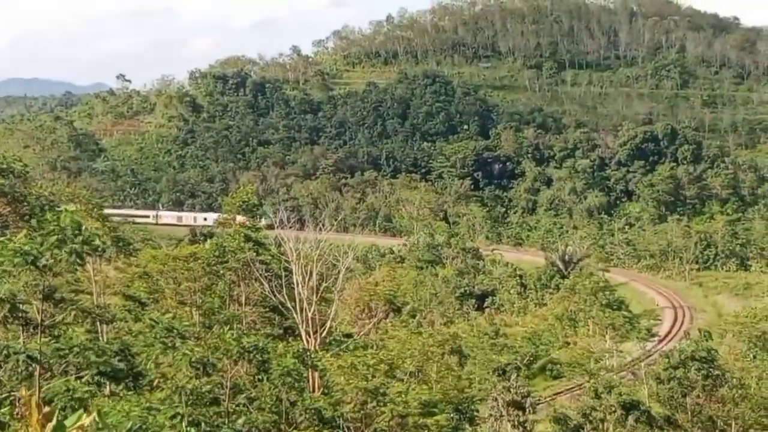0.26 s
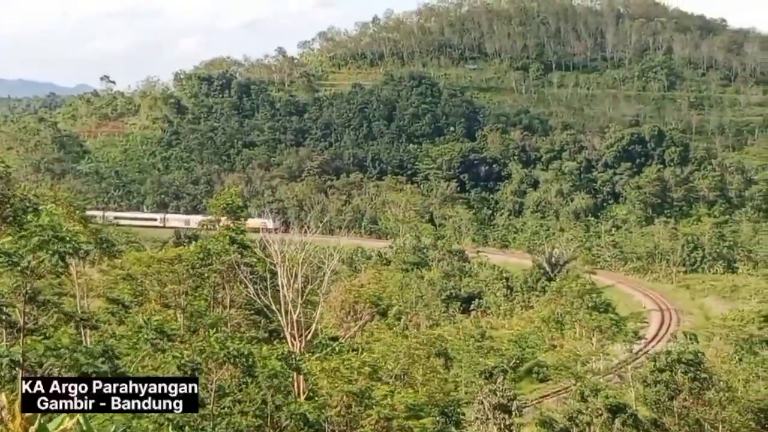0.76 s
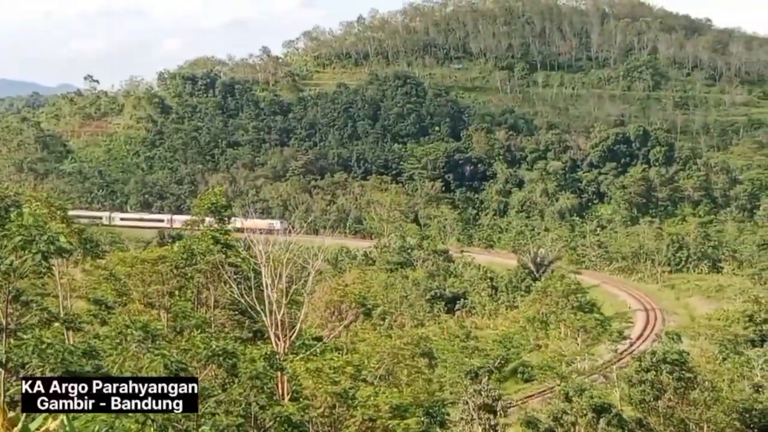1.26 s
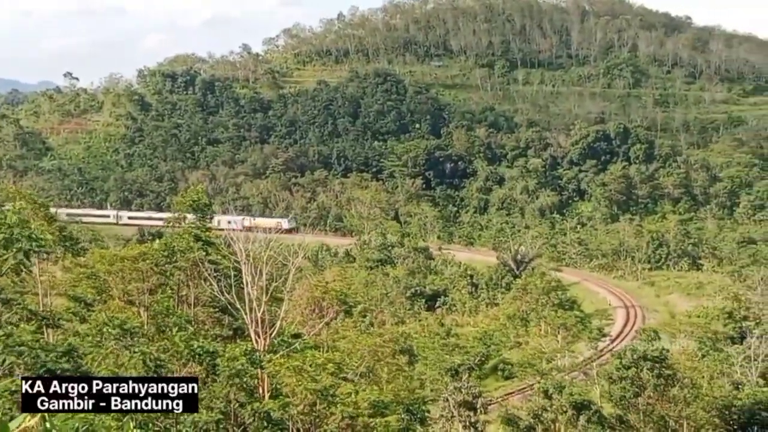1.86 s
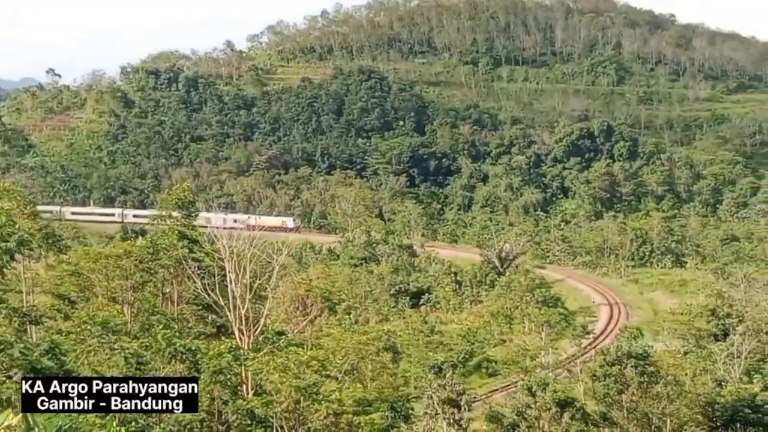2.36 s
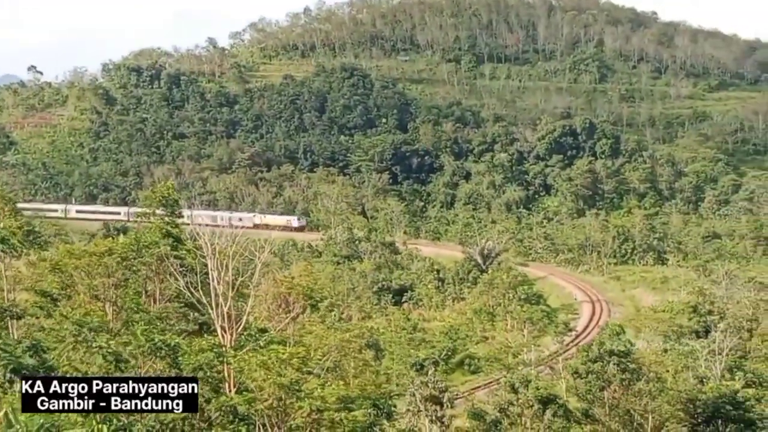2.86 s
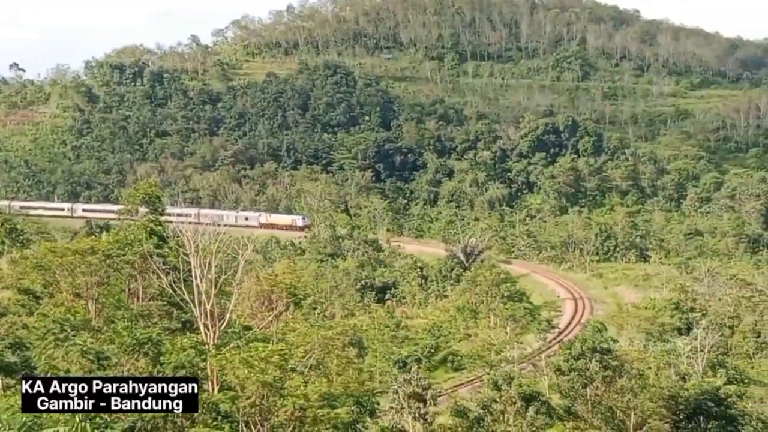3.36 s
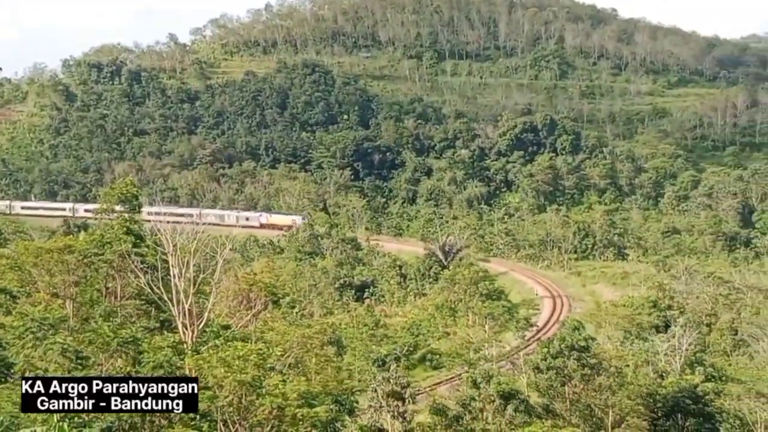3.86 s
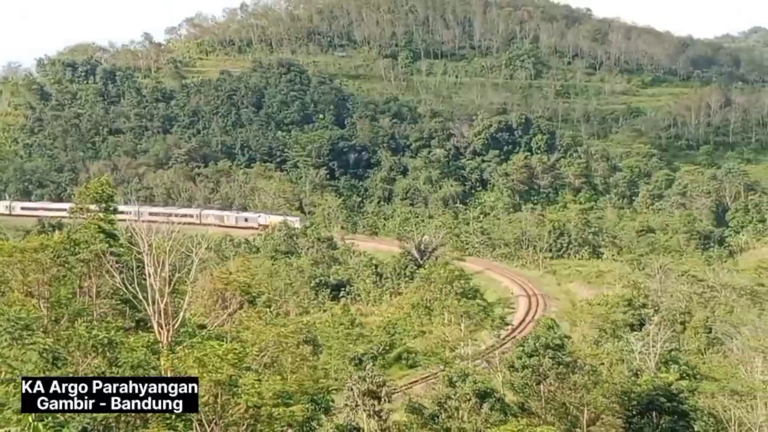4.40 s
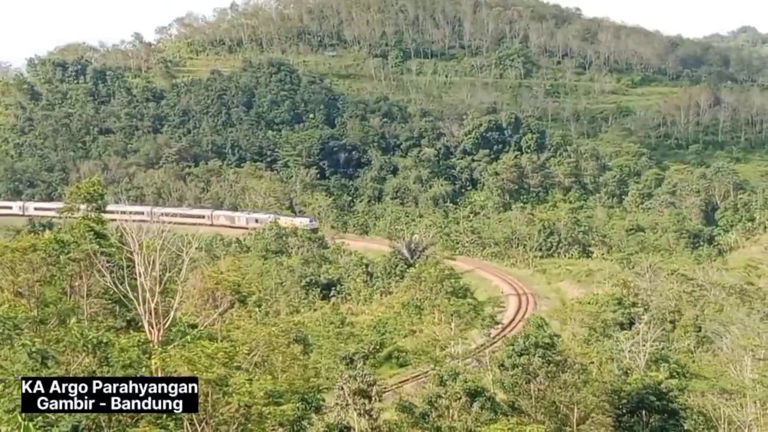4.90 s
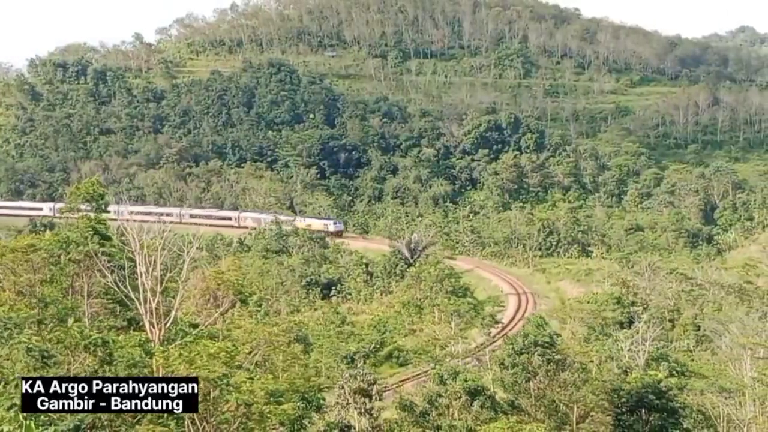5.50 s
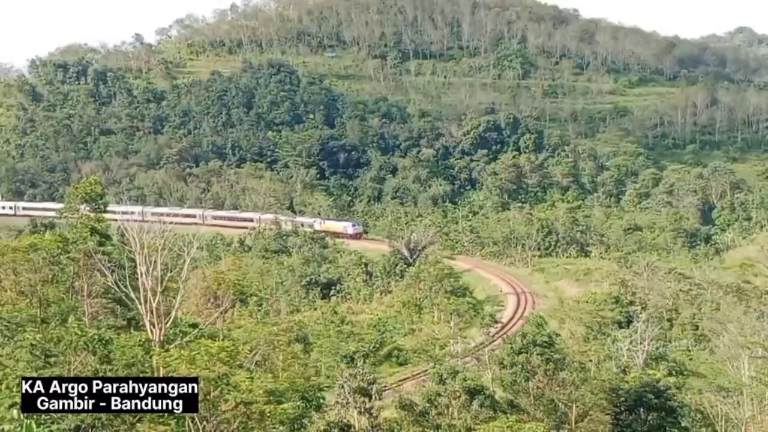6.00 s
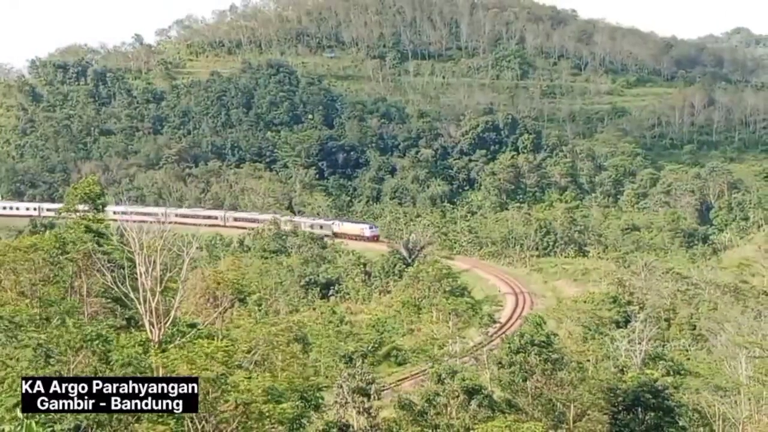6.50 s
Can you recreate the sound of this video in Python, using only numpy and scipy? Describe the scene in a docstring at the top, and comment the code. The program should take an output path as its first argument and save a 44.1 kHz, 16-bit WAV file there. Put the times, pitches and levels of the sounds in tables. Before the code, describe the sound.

Outdoors on an open hillside, wind hits an unprotected microphone with dense low thumps and fluttering gusts. Far behind it a diesel train gives a soft, steady roar with a rapid throbbing exhaust. After about three seconds the wind thins and the train comes forward, strongest near four and a half seconds, then drops quickly to faint, hollow, wavering bands of noise with a couple of soft bumps of wind.

```python
"""Gusts and thumps of wind, made from coloured noise and short swings, buffet the microphone at first. Behind
them a far train roars in bands of noise, its exhaust throbbing as a pulsing loudness. The wind weakens in the
second half, while a faint hiss, a high sizzle and a few ticks lie beneath. Near the end the roar fades, and
faint, hollow bands of noise wander in pitch. There the whole sound dips briefly twice."""
import sys
import numpy as np
from scipy import signal
from scipy.fft import rfft, irfft, next_fast_len
from scipy.io import wavfile
from scipy.ndimage import uniform_filter1d

SR = 44100
rng = np.random.default_rng(int(sys.argv[2]) if len(sys.argv) > 2 else 0)


def unload_wav(signal):
    """Save mono or channel-first audio to the path in sys.argv[1] as 16-bit WAV at rate SR, clipped to [-1, 1]."""
    wavfile.write(
        sys.argv[1],
        SR,
        np.round(np.clip(np.atleast_2d(signal).T, -1, 1) * 32767).astype(np.int16),
    )


N = 297586
TIME = np.arange(N) / SR
FREQS = np.maximum(np.fft.rfftfreq(N, 1 / SR), 1)

# how strongly the train's sound reaches the hillside: (time [s], level [dB])
CARRY = [(0, -2), (0.45, -7), (1.55, -4.5), (2.05, -2.5), (3.95, -1.5), (4.45, 5), (5.21, 1.5),
         (5.33, -11.5), (5.48, -21.5), (5.85, -19), (6.1, -23), (6.42, -23.5), (6.75, -26)]
# single eddies that hit the microphone:
# (time [s], peak level [dB], pitch at the middle [Hz], steep front relative to the swing [dB])
THUMPS = [(0.1, -5.5, 190, -21.5), (0.145, -5, 235, -19), (0.165, -5.5, 250, -11), (0.193, -2.5, 215, -23),
          (0.2322, -3.5, 356, 12), (0.249, -5.5, 330, 3), (0.256, -7.5, 680, 0), (0.33, -11, 380, 18),
          (0.446, -10.5, 310, -6), (0.484, -2.5, 199, -4), (0.594, -9, 270, -17), (0.731, -5, 215, -13),
          (0.751, -6.5, 290, -1.5), (0.858, -6.5, 394, -7), (0.904, -6, 253, -29), (1.027, -3.5, 183, -31),
          (1.262, -9.5, 272, -18), (1.3613, -4.5, 218, -32), (1.394, -7, 287, -18.5),
          (1.495, -7.5, 225, -23), (1.517, -5.5, 185, -22.5), (1.546, -5, 190, -24),
          (1.6324, -7.5, 315, -10.5), (1.682, -5, 293, -24), (1.697, -3, 460, -9), (1.833, -7, 241, -28),
          (1.994, -11, 247, -9.5), (2.196, -8.5, 171, -26.5), (2.254, -4, 219, -22), (2.459, -5, 200, -15),
          (2.524, -10, 199, -11), (2.714, -10.5, 226, -18.5), (3.614, -16, 185, -21),
          (3.813, -14, 267, -17), (3.919, -6, 200, -3.5), (4.058, -17, 224, -17), (4.271, -20, 167, -28),
          (4.668, -18, 180, -20), (5.052, -22.5, 169, -15), (6.331, -16.5, 160, -30),
          (6.541, -12, 159, -42)]


def from_db(db):
    """Turn decibels into a gain."""
    return 10 ** (np.asarray(db) / 20)


def rms_one(x):
    """Scale to an rms (average strength) of 1."""
    return x / np.sqrt(np.mean(x ** 2) + 1e-20)


def in_time(rows):
    """Draw each column of a time table as a curve, sample by sample."""
    times, *columns = np.transpose(rows)
    return [np.interp(TIME, times, column) for column in columns]


def bell(middle_s, half_s):
    """A smooth rise and fall of height 1 round one moment."""
    return np.exp(-.5 * np.minimum(((TIME - middle_s) / half_s) ** 2, 100))


def colour(points):
    """Turn a spectrum table into a gain at every frequency."""
    hz, db = np.transpose(points)
    return from_db(np.interp(np.log(FREQS), np.log(hz), db))


def noise(gains):
    """Random noise with the given gain at every frequency; rms 1."""
    size = next_fast_len(N, True)
    shape = np.interp(np.fft.rfftfreq(size, 1 / SR), FREQS, gains)
    spectrum = rfft(rng.standard_normal(size)) * shape
    return rms_one(irfft(spectrum, size)[:N])


def drift(rate):
    """Slow chance, about rate changes a second; rms 1."""
    return noise(1 / (1 + (FREQS / rate) ** 4))


def even(x, span_s):
    """Hold the level near 1 over spans of span_s, keeping the faster grain."""
    size = max(int(span_s * SR), 8)
    power = uniform_filter1d(uniform_filter1d(x ** 2, size), size)
    return x / np.sqrt(np.abs(power) + 1e-12)


def patches(hz, times, patch_hz, patch_s):
    """Smooth chance over pitch and time; rms 1."""
    field = rng.standard_normal((len(hz), len(times)))
    steps_per_patch = (patch_hz / hz[1], patch_s / times[1])
    for axis, steps in enumerate(steps_per_patch):
        blur = np.exp(-.5 * (np.arange(-40, 41) / steps) ** 2)
        field = signal.fftconvolve(field, np.expand_dims(blur, 1 - axis), "same")
    return rms_one(field)


def scatter(x, patchy_db, patch_hz, patch_s):
    """Moving air and many paths through the trees make each pitch swell and fade on its own."""
    hz, times, cells = signal.stft(x, SR, nperseg=1024, noverlap=768)
    cells = cells * from_db(patchy_db * patches(hz, times, patch_hz, patch_s))
    return rms_one(signal.istft(cells, SR, nperseg=1024, noverlap=768)[1][:N])


def sizzle():
    """A faint high sizzle of the hillside: patchy noise whose level flickers."""
    # (frequency [Hz], relative level [dB])
    sizzle_spectrum = [(4900, -20.5), (5450, 1), (6700, -7.5), (7800, 2), (8300, -22.5)]
    # before the flicker: (time [s], level [dB])
    sizzle_level = [(0, -79), (1.1, -82.5), (2.5, -81), (4.3, -75), (5.15, -73.5), (5.35, -82)]
    grain = scatter(noise(colour(sizzle_spectrum)), patchy_db=6.0, patch_hz=110, patch_s=0.0055)
    flicker_db = 2.0 * drift(25)
    return from_db(in_time(sizzle_level)[0] + flicker_db) * grain


def ticks():
    """Tiny high ticks near the microphone: each is a tone that dies away almost at once."""
    # (time [s], starting level [dB])
    tick_list = [(0.848, -46.5), (1.353, -52), (1.598, -48), (3.888, -55)]
    pitch_hz, decay_s = 11770, .0002
    out = np.zeros(N)
    age = TIME[:SR // 100]
    tick = np.sin(2 * np.pi * pitch_hz * age) * np.exp(-age / decay_s)
    for time_s, level_db in tick_list:
        start = int(time_s * SR)
        out[start:start + len(tick)] += from_db(level_db) * tick
    return out


def background():
    """An even hiss of plain noise, a flickering high sizzle and a few tiny ticks."""
    hiss_db = -89.5
    return from_db(hiss_db) * rng.standard_normal(N) + sizzle() + ticks()


def wind_levels():
    """Buffeting and flutter in dB: the gusts add their power to the steady blow."""
    # the steady blow between gusts: (time [s], level [dB])
    steady_blow = [(0, -15), (0.8, -19.5), (1.2, -20.5), (1.75, -17.5), (2.45, -20), (2.56, -25.5),
                   (2.95, -28.5), (3.3, -31.5), (3.5, -27), (4.02, -25.5), (4.18, -35), (5.2, -38.5),
                   (5.27, -54.5), (6.1, -59.5), (6.45, -42.5), (6.75, -57)]
    # gusts: (time [s], half width [s], buffeting level [dB], level of the flutter of fine eddies [dB])
    gusts = [(0.186, 0.036, -26, -19), (0.27, 0.034, -38.5, -18), (0.402, 0.0091, -17.5, -16.5),
             (0.489, 0.006, -13.5, -13), (0.659, 0.0084, -13, -20), (0.785, 0.014, -13, -26),
             (0.862, 0.0034, -7, -16), (1.007, 0.011, -9.5, -23), (1.071, 0.0064, -16, -18.5),
             (1.386, 0.026, -16.5, -27.5), (1.613, 0.015, -13.5, -21.5), (1.652, 0.012, -19, -17.5),
             (1.83, 0.058, -21.5, -25), (2.022, 0.016, -15.5, -17), (2.27, 0.033, -17, -33),
             (2.352, 0.016, -13, -27.5), (2.449, 0.016, -11, -24), (2.628, 0.0079, -17, -34.5),
             (2.72, 0.049, -22, -34.5), (2.81, 0.0084, -23, -59), (3.414, 0.019, -19.5, -51),
             (3.825, 0.0082, -19, -38), (3.863, 0.005, -13, -27.5), (3.897, 0.014, -14, -24.5),
             (4.113, 0.0083, -23.5, -40), (4.437, 0.025, -27.5, -53), (4.55, 0.012, -28.5, -53),
             (4.861, 0.011, -28, -46), (5.47, 0.016, -47, -58), (5.695, 0.013, -37, -63),
             (5.81, 0.042, -32.5, -75), (6.344, 0.015, -24, -47), (6.39, 0.008, -28, -62)]
    blow_db = in_time(steady_blow)[0]
    buffet = from_db(blow_db) ** 2
    # the harder it blows, the more it flutters: -28 dB at a blow of -19 dB, and 1.7 dB more per dB
    flutter = from_db(-28 + 1.7 * (blow_db + 19)) ** 2
    for time_s, half_s, buffet_db, flutter_db in gusts:
        swell = bell(time_s, half_s)
        buffet = buffet + swell * from_db(buffet_db) ** 2
        flutter = flutter + swell * from_db(flutter_db) ** 2
    return 10 * np.log10(buffet), 10 * np.log10(flutter)


def wind(lumps_db, flutter_lumps_db, strong_db):
    """Lumpy swirling air at the microphone: a light breeze thuds dully, strong gusts add finer eddies."""
    # three colours of wind: (frequency [Hz], relative level [dB])
    strong_spectrum = [(32, -38.5), (50, -20), (70, -15), (105, 3.5), (180, 2.5), (260, -1), (340, -11.5),
                       (450, -22), (700, -35), (1500, -41), (4000, -85.5)]
    breeze_spectrum = [(32, -39), (50, -13), (70, 0.5), (105, 5), (135, 3.5), (190, -13.5), (260, -3.5),
                       (400, -35.5), (1000, -83.5)]
    flutter_spectrum = [(150, -16), (300, 11), (400, 9), (540, 1), (720, -6.5), (950, -14.5), (1400, -44.5),
                        (3500, -81.5)]
    gust_db, flutter_db = wind_levels()
    lumps = drift(32)
    eddies = rms_one(lumps + drift(80))
    # 0 in a light breeze, 1 in a strong gust, half way at strong_db
    strong = .5 + .5 * np.tanh((gust_db - strong_db) / 9)
    strong_air = np.sqrt(strong) * noise(colour(strong_spectrum))
    light_air = np.sqrt(1 - strong) * noise(colour(breeze_spectrum))
    buffet = even((strong_air + light_air) * from_db(lumps_db * lumps), span_s=0.041)
    flutter = noise(colour(flutter_spectrum)) * from_db(flutter_lumps_db * eddies)
    flutter = even(flutter, span_s=0.02)
    return from_db(gust_db) * buffet + from_db(flutter_db) * flutter


def lulls(depth, half_s):
    """A large eddy sweeps the smaller ones off the microphone: the wind's gain dips at each thump."""
    near = sum(bell(time_s, half_s) for time_s, *_ in THUMPS)
    return 1 - np.clip(depth * near, 0, .9)


def thumps(cycles, slowing, edge_s):
    """Each eddy shoves the diaphragm out and back, slowing as it passes, with a steep front between."""
    out = np.zeros(N)
    age = np.arange(-SR // 40, SR // 40) / SR
    front = age / edge_s / (1 + (age / edge_s) ** 2) ** 2
    for time_s, peak_db, hz, front_db in THUMPS:
        turns = (1 - np.exp(-slowing * age * hz)) / slowing
        swing = np.sin(2 * np.pi * turns) * np.exp(-.5 * (turns / cycles) ** 2)
        swing = swing * np.hanning(len(age))
        shove = swing / swing.max() + from_db(front_db) * front / front.max()
        start = int((time_s + age[0]) * SR)
        out[start:start + len(shove)] += from_db(peak_db) * shove / shove.max()
    return out


def hollow_band(curve, width_hz):
    """A narrow, almost pitched band of noise: slow chance carried on a wandering tone."""
    centre_hz, level_db = in_time(curve)
    phase = 2 * np.pi * np.cumsum(centre_hz) / SR
    narrow = drift(width_hz / 2) * np.cos(phase) + drift(width_hz / 2) * np.sin(phase)
    # fade in over 0.09 s, ending at the first time in the table
    fade_in = np.clip(1 + (TIME - curve[0][0]) / 0.09, 0, 1)
    waver_db = 1.8 * drift(32)
    return fade_in * from_db(level_db + waver_db) * even(narrow, span_s=0.028)


def hollow_bands():
    """Near the end: five narrow bands of noise, each wandering on its own."""
    # levels are before the waver: (time [s], centre [Hz], level [dB])
    lowest_path = [(5.15, 350, -52), (5.48, 338, -39.5), (5.58, 335, -46.5), (6.0, 318, -48),
                   (6.28, 295, -50.5), (6.45, 296, -42.5), (6.6, 300, -50)]
    second_path = [(5.18, 700, -52), (5.26, 710, -39.5), (5.44, 680, -53.5), (5.53, 690, -45),
                   (5.62, 670, -67), (6.24, 630, -70), (6.4, 655, -49.5), (6.49, 670, -41.5),
                   (6.58, 680, -50.5), (6.63, 640, -63), (6.7, 680, -52)]
    third_path = [(5.25, 1284, -75), (5.49, 1230, -65), (5.55, 1173, -58), (5.62, 1150, -49),
                  (5.79, 1180, -71), (6.05, 1118, -74), (6.16, 1060, -59), (6.27, 1162, -74),
                  (6.35, 1153, -59.5), (6.46, 1083, -68), (6.49, 1070, -47), (6.58, 1090, -55),
                  (6.75, 1084, -70)]
    fourth_path = [(5.2, 1720, -71), (5.34, 1692, -52.5), (5.44, 1774, -50), (5.52, 1900, -65.5),
                   (5.68, 1720, -53), (5.79, 1720, -51.5), (5.85, 1710, -62), (5.92, 1644, -52),
                   (5.98, 1580, -71), (6.22, 1637, -59), (6.31, 1670, -90), (6.42, 1650, -53),
                   (6.55, 1630, -58), (6.63, 1667, -73.5)]
    top_path = [(5.3, 2100, -63), (5.72, 2090, -78), (5.82, 2063, -56), (5.92, 1973, -56), (6.1, 1960, -80),
                (6.54, 2030, -64.5)]
    low = hollow_band(lowest_path, width_hz=83) + hollow_band(second_path, width_hz=135)
    middle = hollow_band(third_path, width_hz=95) + hollow_band(fourth_path, width_hz=176)
    return low + middle + hollow_band(top_path, width_hz=210)


def firing(wander, alternate_db, uneven_db, puff_width):
    """Loudness of the exhaust: a puff per engine firing, strong and weak in turn; rms 1."""
    firing_hz = 36.25  # on average; the pace wanders a little
    turns = np.cumsum(firing_hz * (1 + wander * drift(1.6))) / SR
    index = turns.astype(int)
    chance = rng.standard_normal(N)[index]  # one draw for each puff
    strength = from_db(alternate_db * (-1) ** index + uneven_db * chance)
    # the long path rounds each puff to a bell, puff_width of a cycle wide
    puff = np.exp(-.5 * ((turns % 1 - .5) / puff_width) ** 2)
    return rms_one(strength * puff)


def throb(puffs, direct):
    """A share of the sound comes as puffs, the rest as smooth echo from the hills."""
    direct = np.clip(direct, 0, 1)
    return np.sqrt(1 - direct + direct * puffs ** 2)


def arriving(level_db, follows):
    """Gain of one part of the train: level_db plus the share of the carry's swing that it follows."""
    return from_db(level_db + follows * in_time(CARRY)[0])


def train_band(low_hz, high_hz, level_db, follows, patchy_db):
    """One band of the far roar: noise kept between two edges, patchy from its long path."""
    # (frequency [Hz], relative level [dB])
    train_spectrum = [(410, 1), (470, -9), (670, -10.5), (830, -12.5), (970, -17), (1220, -10.5),
                      (1420, -20), (1800, -17), (2200, -19.5), (2600, -19), (2800, -34)]
    edges = 1 / np.sqrt((1 + (low_hz / FREQS) ** 30) * (1 + (FREQS / high_hz) ** 40))
    roar = noise(colour(train_spectrum) * edges)
    roar = scatter(roar, patchy_db, patch_hz=52.0, patch_s=0.043)
    return arriving(level_db, follows) * even(roar, span_s=0.14)


def exhaust_hiss():
    """The highest part of the exhaust: noise with a fine, quick patchiness."""
    # (frequency [Hz], relative level [dB])
    hiss_spectrum = [(2000, -23.5), (2800, -4), (3030, 4), (3270, -8), (3530, -1.5), (4000, -11.5),
                     (4300, -19.5), (4550, -40), (5100, -47), (5500, -38.5), (7800, -36), (8400, -55.5)]
    hiss = scatter(noise(colour(hiss_spectrum)), patchy_db=5.0, patch_hz=89, patch_s=0.011)
    return arriving(level_db=-57, follows=0.76) * even(hiss, span_s=0.027)


def far_path(x):
    """The roar changes colour on its way: it swells or fades round some pitches and grows patchy when faint.
    One very brief swell, at 0.943 s, is a short far knock."""
    # (time [s], half width [s], gain [dB], centre [Hz], spread [octaves])
    swells = [(0.03, 0.045, 7, 3300, 0.77), (0.19, 0.15, 7, 2520, 0.075), (0.91, 0.11, 6.5, 1660, 0.77),
              (0.943, 0.0055, 11, 1540, 0.54), (0.97, 0.1, 6, 1235, 0.1), (2.06, 0.15, 8.5, 1150, 0.45),
              (2.36, 0.11, -7.5, 3310, 0.25), (3.35, 0.36, 6, 1154, 0.45), (4.501, 0.54, -4.5, 1156, 0.13),
              (4.75, 0.26, -0.5, 3200, 0.77)]
    hz, times, cells = signal.stft(x, SR, nperseg=512, noverlap=384)
    lost_db = np.maximum(-np.interp(times, *np.transpose(CARRY)), 0)
    # 0.19 dB of patches for each dB of carry lost
    gain_db = 0.19 * lost_db * (patches(hz, times, patch_hz=70, patch_s=0.04) - .5)
    for time_s, half_s, swell_db, centre_hz, octaves in swells:
        near_pitch = np.exp(-.5 * (np.log2((hz + 1) / centre_hz) / octaves) ** 2)
        near_time = np.interp(times, TIME, bell(time_s, half_s))
        gain_db = gain_db + swell_db * np.outer(near_pitch, near_time)
    return signal.istft(cells * from_db(gain_db), SR, nperseg=512, noverlap=384)[1][:N]


def train():
    """Rumble and wheel roar below, the more strongly throbbing exhaust above."""
    puffs = firing(wander=0.016, alternate_db=1.5, uneven_db=1.5, puff_width=0.31)
    rumble = train_band(low_hz=232, high_hz=421, level_db=-36, follows=0.9, patchy_db=-0.8)
    wheels = train_band(low_hz=500, high_hz=894, level_db=-42, follows=0.99, patchy_db=1.5)
    bark = train_band(low_hz=933, high_hz=1347, level_db=-45.5, follows=0.92, patchy_db=3.0)
    rasp = train_band(low_hz=1362, high_hz=2590, level_db=-45, follows=0.93, patchy_db=3.0)
    low = (rumble + wheels) * throb(puffs, direct=0.38)
    exhaust = (bark + rasp + exhaust_hiss()) * throb(puffs, direct=0.66)
    return far_path(low + exhaust)


def dropouts():
    """Gain of the whole sound, which dips briefly."""
    # (time [s], half width [s], depth [dB])
    dips = [(5.95, 0.013, -15), (6.08, 0.026, -14)]
    return from_db(sum(depth_db * bell(time_s, half_s) for time_s, half_s, depth_db in dips))


def scene():
    """The far train, the wind on the microphone and the faint background, with the brief dips."""
    blow = wind(lumps_db=4.0, flutter_lumps_db=6.0, strong_db=-27.5)
    blow = blow * lulls(depth=0.65, half_s=0.0032)
    knocks = thumps(cycles=0.42, slowing=0.59, edge_s=0.00081)
    everything = train() + hollow_bands() + blow + knocks + background()
    return (everything * dropouts())[None]


def record(dry):
    """The microphone sheds the deepest bass, the highest peaks are rounded, the top is cut."""
    thin = signal.sosfilt(signal.butter(2, 38, "high", fs=SR, output="sos"), dry)
    rounded = thin / (1 + (thin / .9) ** 6) ** (1 / 6)
    top_cut = signal.cheby2(12, 70, 15500, fs=SR, output="sos")  # 70 dB down from 15500 Hz up
    return signal.sosfilt(top_cut, rounded)


dry = scene()
out = record(dry)
unload_wav(out)
```